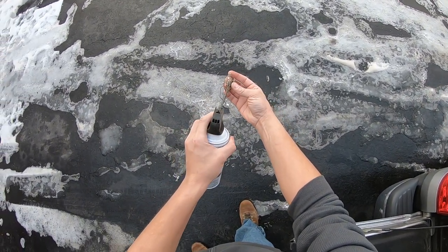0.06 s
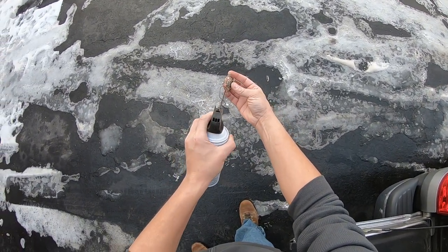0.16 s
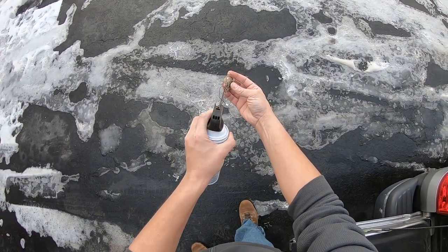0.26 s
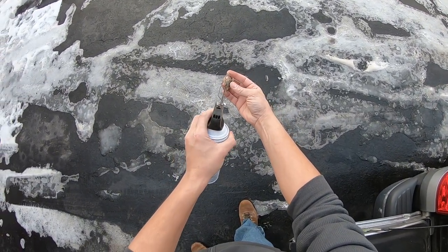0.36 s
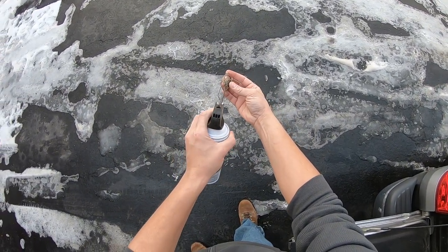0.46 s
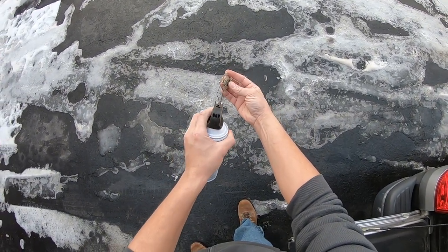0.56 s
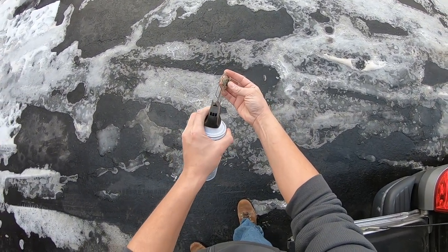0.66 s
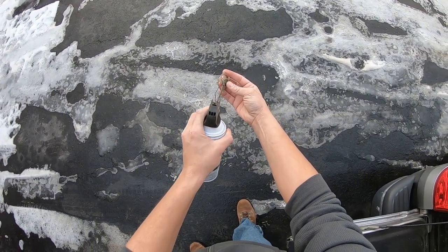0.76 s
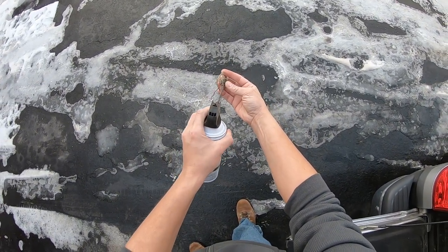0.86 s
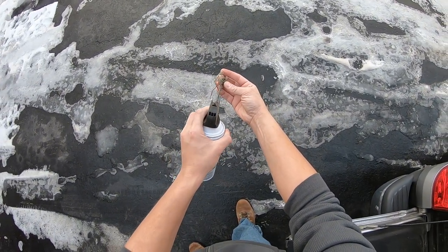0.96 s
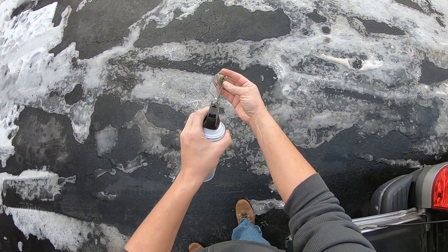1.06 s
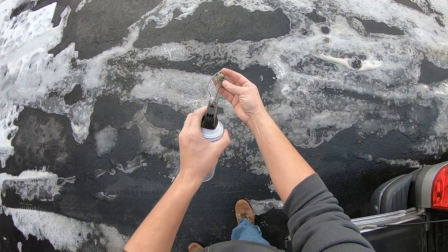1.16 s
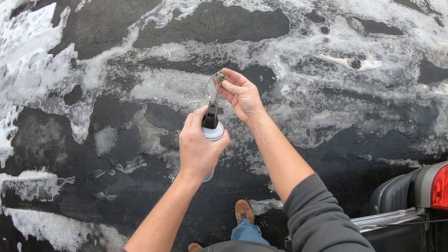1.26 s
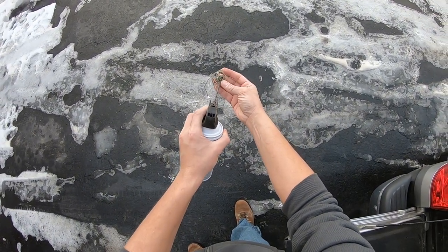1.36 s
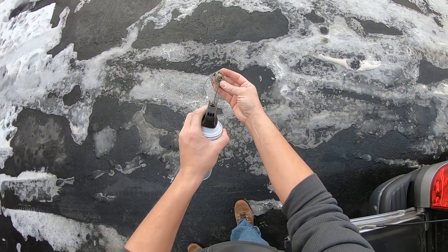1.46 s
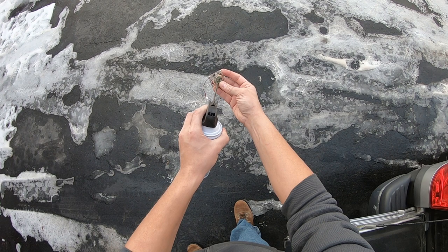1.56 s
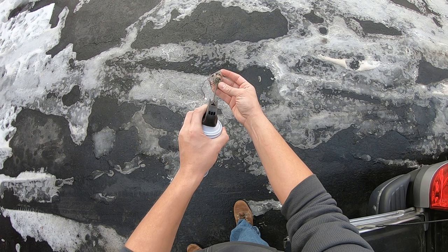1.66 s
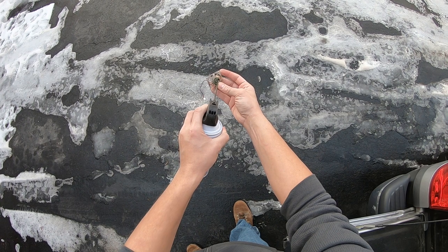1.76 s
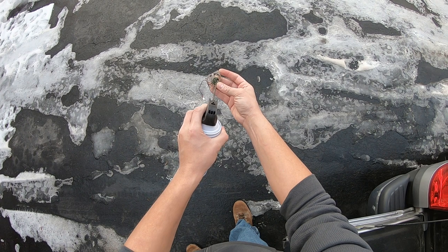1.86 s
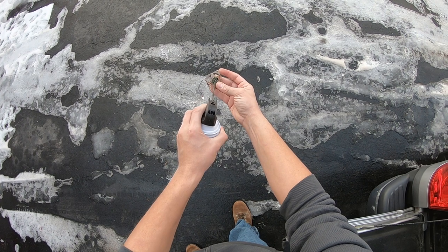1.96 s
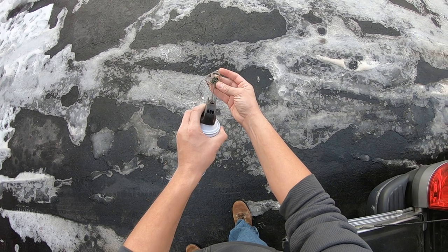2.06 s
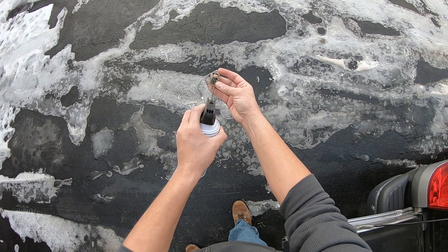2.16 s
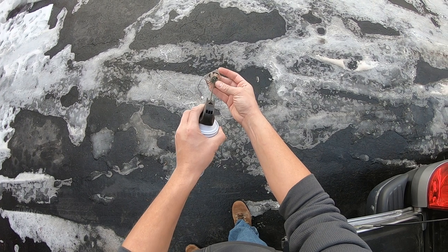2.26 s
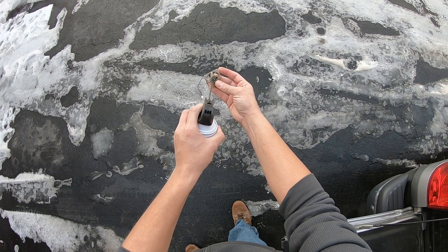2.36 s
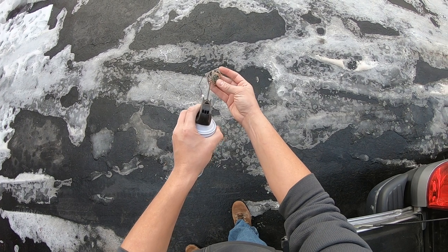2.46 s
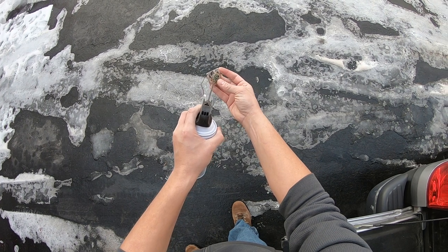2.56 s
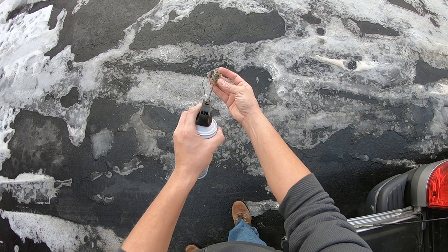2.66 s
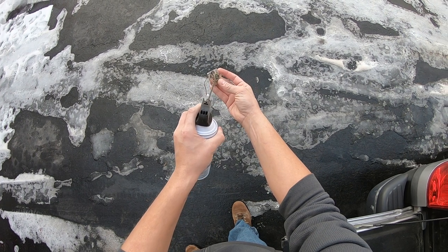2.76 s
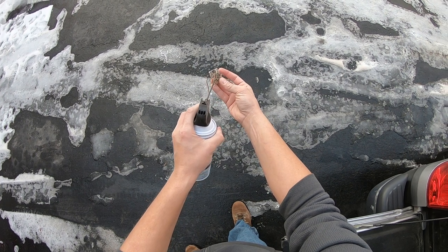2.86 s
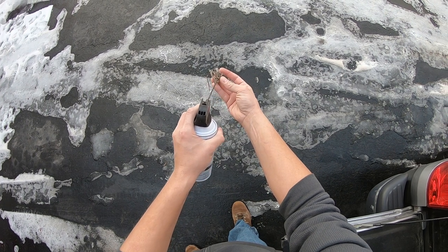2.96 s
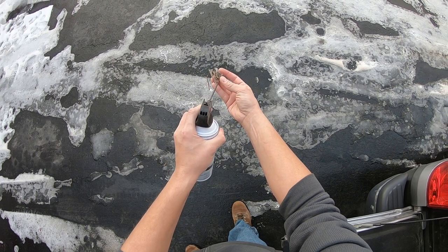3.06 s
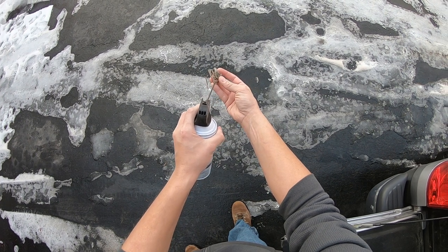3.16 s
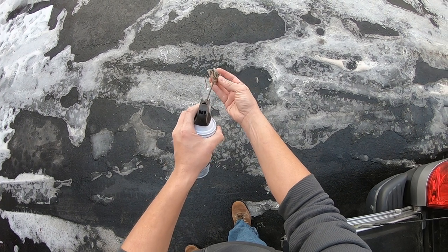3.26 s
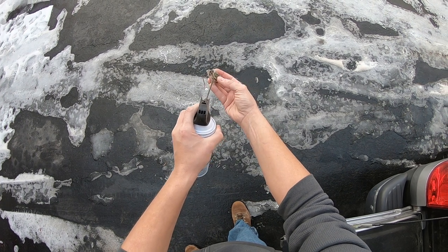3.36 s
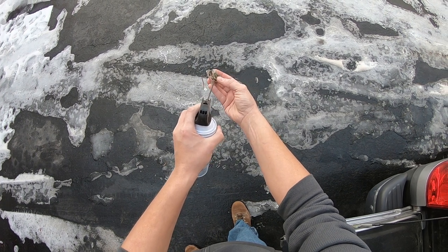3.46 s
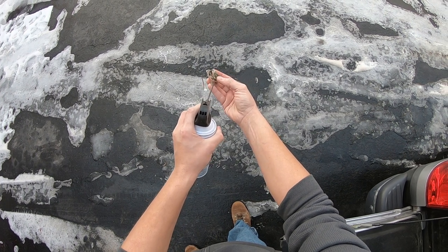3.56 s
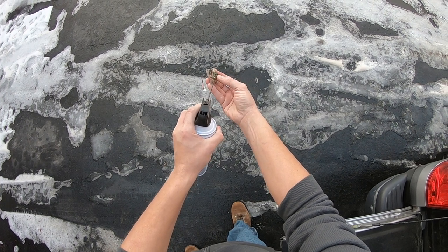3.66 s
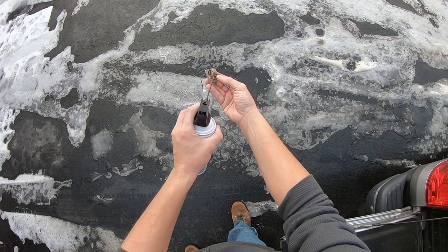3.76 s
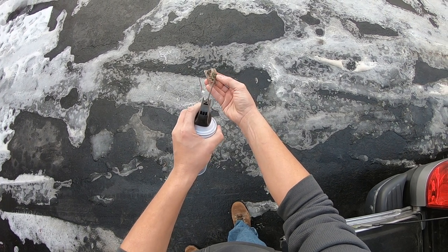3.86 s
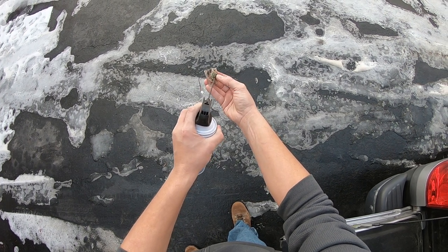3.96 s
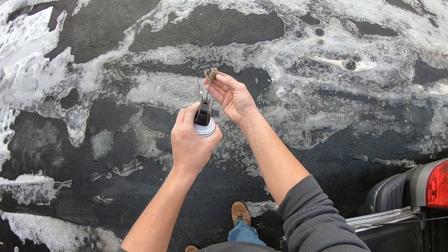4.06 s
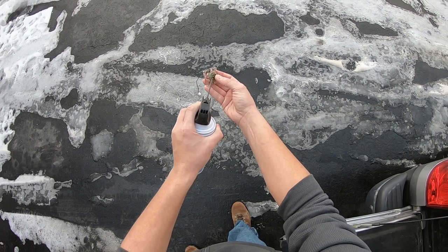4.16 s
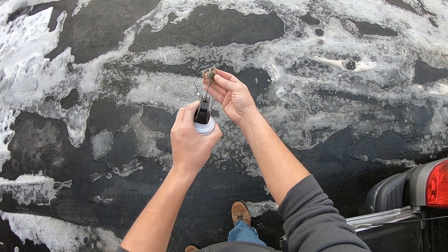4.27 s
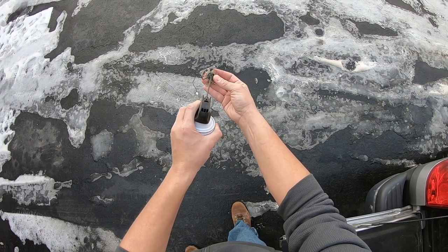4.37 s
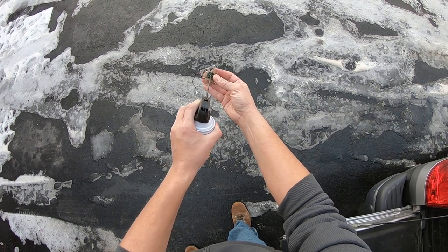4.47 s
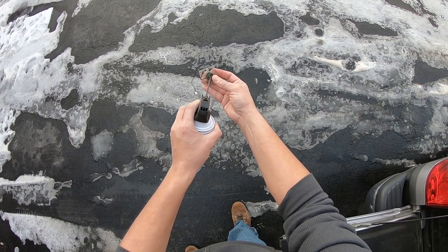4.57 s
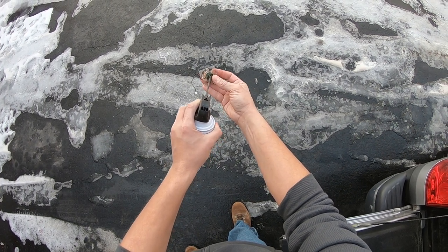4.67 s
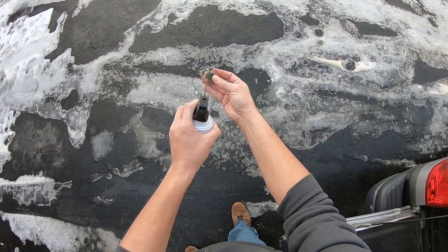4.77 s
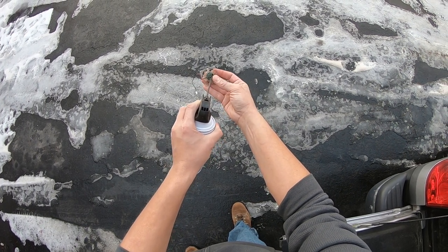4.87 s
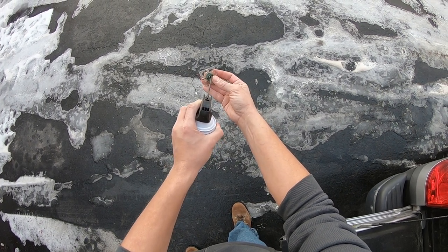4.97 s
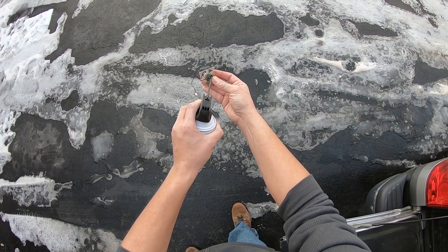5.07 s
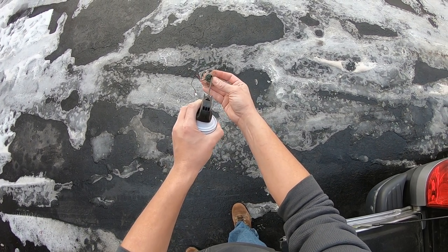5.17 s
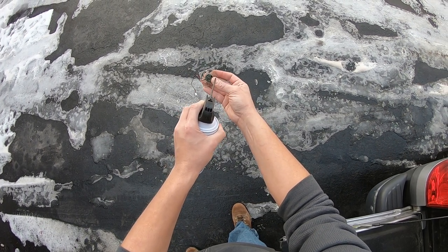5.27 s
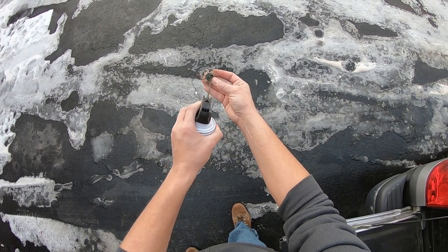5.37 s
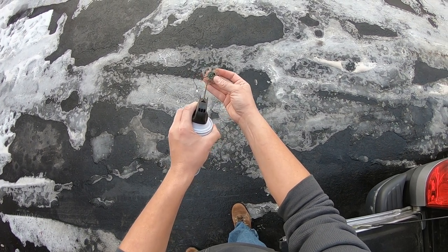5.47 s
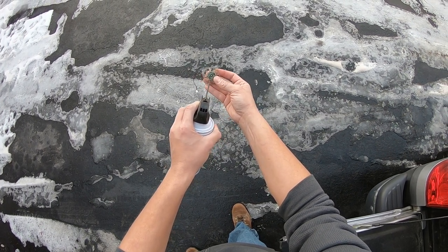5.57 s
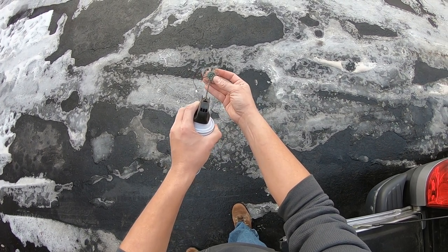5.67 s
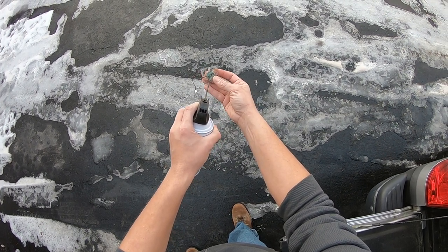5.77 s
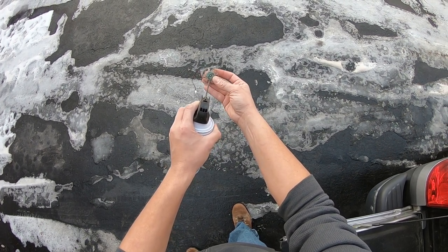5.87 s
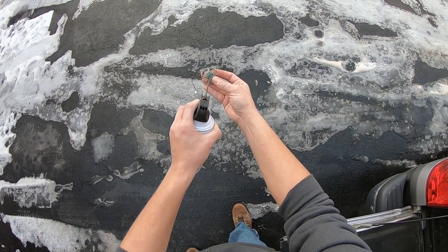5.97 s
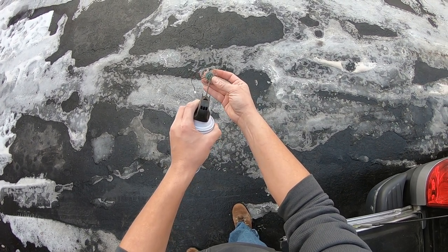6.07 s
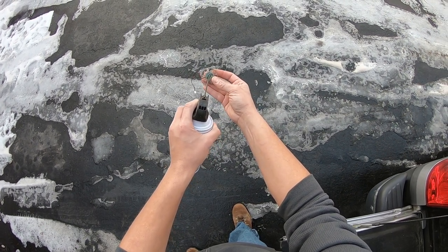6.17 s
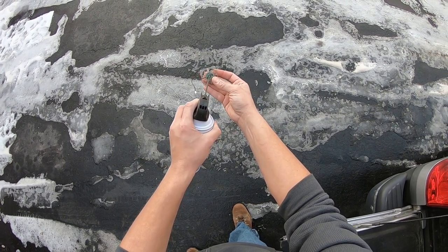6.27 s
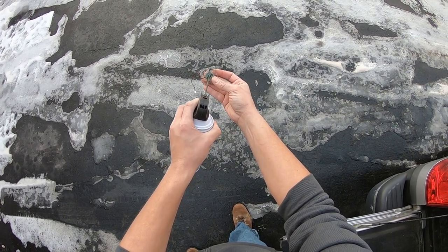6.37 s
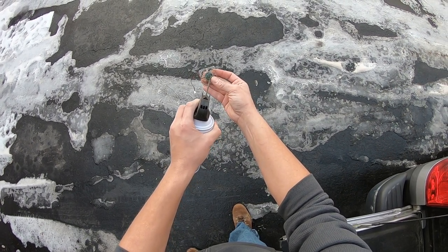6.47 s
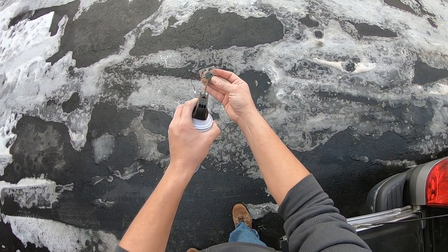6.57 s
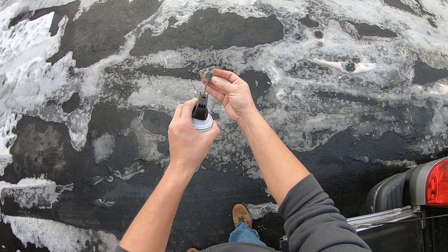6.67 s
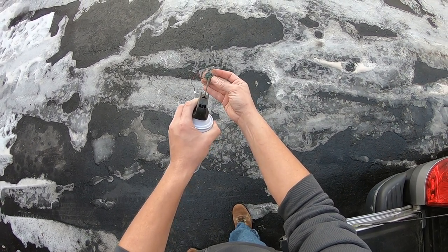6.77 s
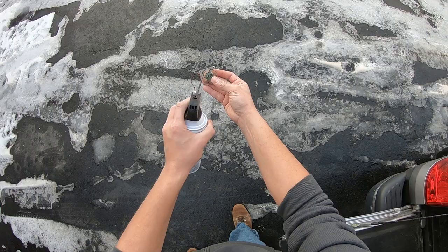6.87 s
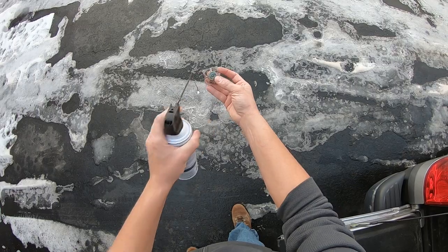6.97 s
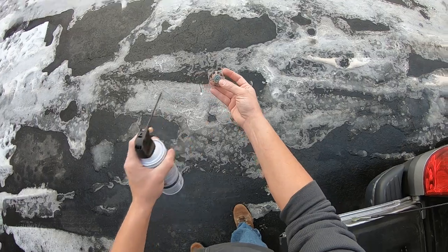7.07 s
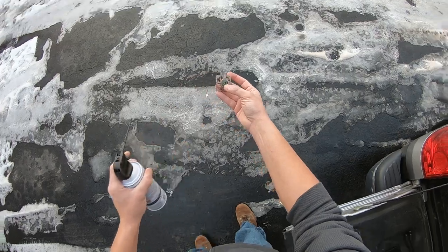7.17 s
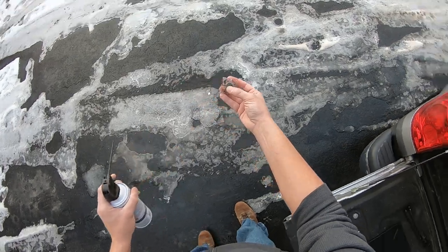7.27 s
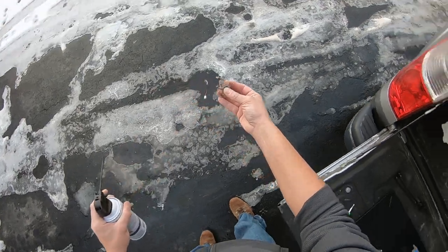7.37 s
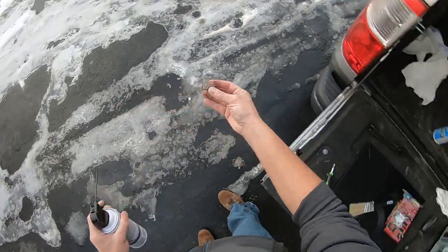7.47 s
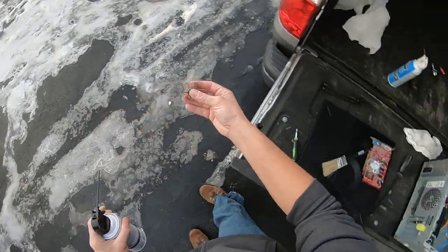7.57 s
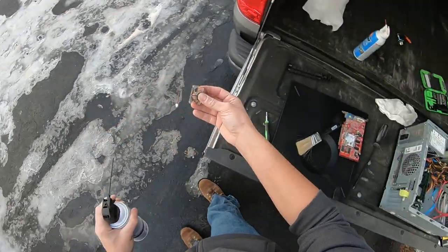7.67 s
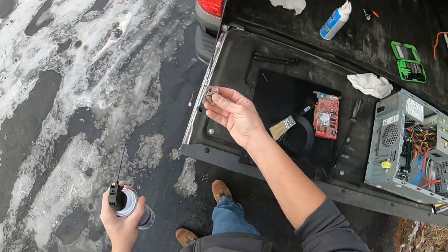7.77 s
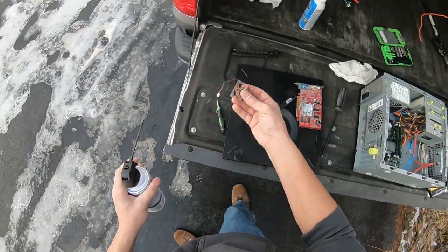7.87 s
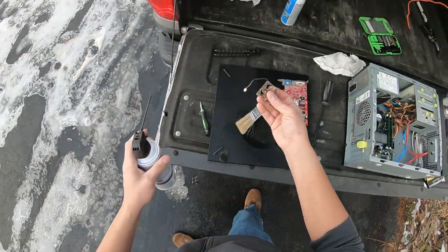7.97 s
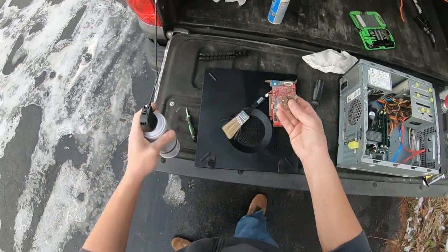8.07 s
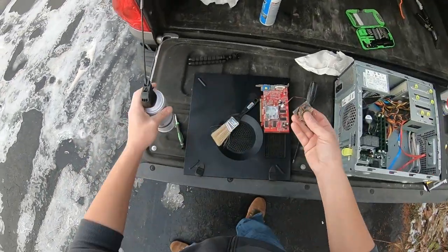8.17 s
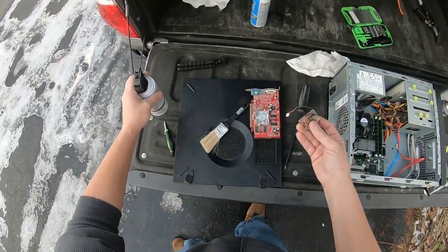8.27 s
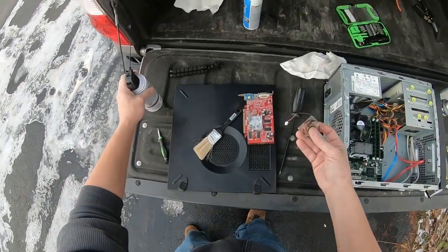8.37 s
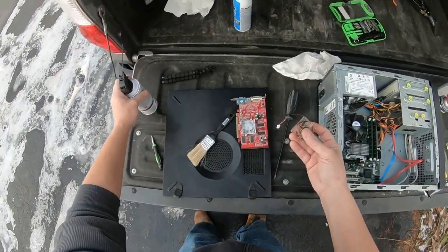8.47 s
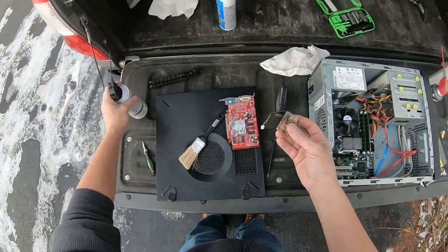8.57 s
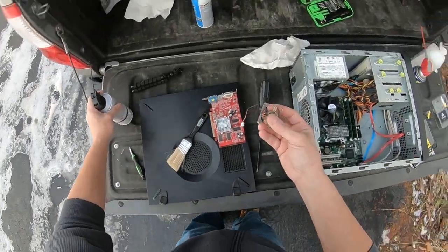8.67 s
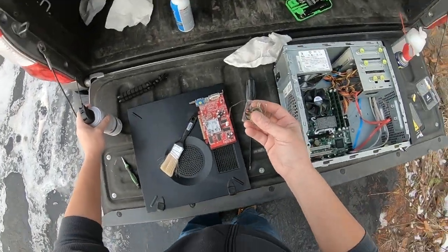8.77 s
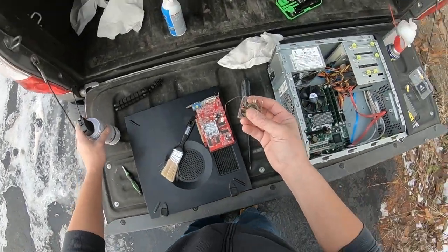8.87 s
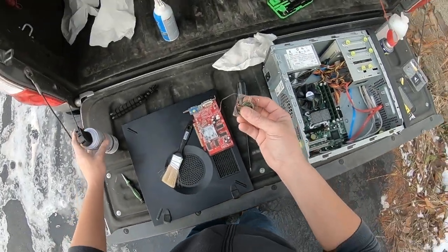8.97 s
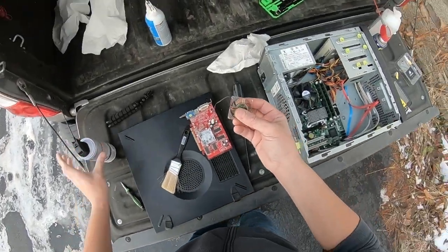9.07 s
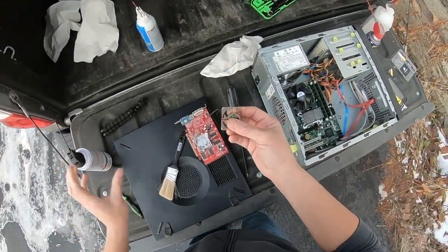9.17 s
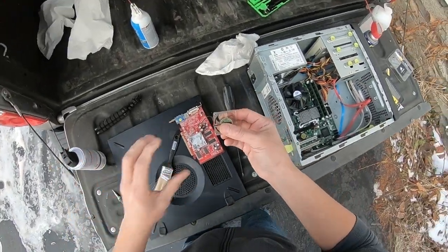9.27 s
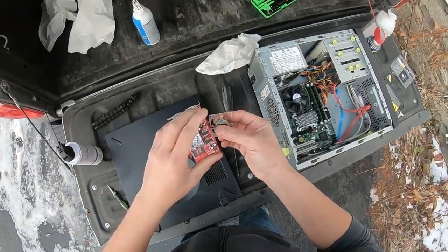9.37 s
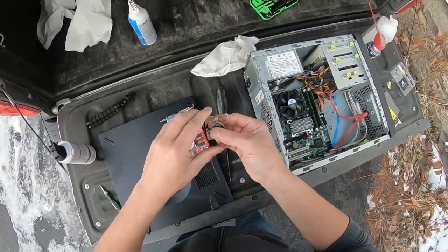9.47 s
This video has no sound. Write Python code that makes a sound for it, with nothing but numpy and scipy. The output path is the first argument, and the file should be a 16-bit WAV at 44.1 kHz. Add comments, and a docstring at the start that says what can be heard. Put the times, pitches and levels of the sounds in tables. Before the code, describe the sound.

Outdoors beside a truck, close to the microphone, an aerosol can blasts a small hand-held fan: two bursts of about a second, then a nearly four-second one. The hiss flickers brighter as it crosses the fan's edges. Sleeves rustle, the can knocks lightly in the hands, then lands on the tailgate with a heavy, hollow thump and short clatter. Quiet open air and a faint low hum lie behind.

```python
"""Outdoors, beside a truck: three bursts from an aerosol duster blow through a small hand-held fan.
The jet is bands of shaped noise; it hisses, and turns bright whenever it cuts across an edge of the fan.
Sleeves scuff as soft noise bands and the can knocks in the hands as short clatters.
Then it lands on the tailgate: ringing sine modes, a noise clatter and a dry crack, with a faint answer
from the yard. Behind it lie broad air noise, a far machine's hum and low buffets at the microphones."""
import sys
import numpy as np
from scipy import signal
from scipy.fft import rfft, irfft, next_fast_len
from scipy.io import wavfile
from scipy.ndimage import map_coordinates

SR = 44100
rng = np.random.default_rng(int(sys.argv[2]) if len(sys.argv) > 2 else 0)


def generate_wav(signal):
    """Clip the signal to [-1, 1] and save it as 16-bit WAV at the path in sys.argv[1]."""
    frames = np.transpose(np.atleast_2d(signal))
    scaled = np.clip(frames, -1, 1) * 32767
    pcm = np.round(scaled).astype(np.int16)
    wavfile.write(sys.argv[1], SR, pcm)


N = 420273
TOP_HZ = 15850  # upper band limit of the microphones


def amp(db):
    """Decibels to gain."""
    return 10 ** (np.asarray(db) / 20)


def unit(x):
    """Scale to rms 1."""
    return x / np.sqrt(np.mean(x ** 2) + 1e-20)


def along(points, hz):
    """Each column of (f/Hz, ..) rows, read on a log frequency axis."""
    f, *cols = np.transpose(points)
    log_hz = np.log(hz + 1)
    return np.squeeze([np.interp(log_hz, np.log(f), c) for c in cols])


def clock():
    """The time of every sample, in seconds."""
    return np.arange(N) / SR


def bell(s, length):
    """A bell-shaped gain that peaks at s and is down 17 dB one length away."""
    return np.exp(-2 * ((clock() - s) / length) ** 2)


def swells(rows):
    """The sum of bells from (t/s, length/s, level/dB) rows."""
    return sum(amp(db) * bell(s, length) for s, length, db in rows)


def gate(start, end, rise, fall):
    """A gain that opens smoothly around start and closes around end."""
    t = clock()
    opening = 1 + np.tanh((t - start) / (2 * rise))
    closing = 1 + np.tanh((end - t) / (2 * fall))
    return opening * closing / 4


def wobble(rate, size=N):
    """A smooth random curve, rate knots a second."""
    knots = rng.standard_normal(int(size * rate / SR) + 4)
    return map_coordinates(knots, [np.arange(size) * rate / SR])


def filtered(x, response):
    """x shaped by a response of frequency."""
    n = x.shape[-1]
    m = next_fast_len(n + 8192)
    spectrum = rfft(x, m) * response(np.fft.rfftfreq(m, 1 / SR))
    return irfft(spectrum, m)[..., :n]


# how sound from the hands reaches the two ports: f/Hz, L-R level/dB, left lead/rad, likeness/0-1
HAND_PORTS = [(150, 0, 3, .4), (453, -0.5, 3.5, 0.5), (750, -1.5, 2.5, 0.6), (1500, -1, 1.3, 0.7),
              (2050, 4.5, 1.4, 0.4), (2480, -0.5, -1, 0.96), (4300, 0, 0.57, 0.99), (4950, -2.5, 0.5, .55),
              (5500, -0.5, 0.53, 0.8), (6650, 2, 1.38, 0.6), (7350, 8, 0.1, .5), (7990, 3, 1.04, .82),
              (9200, 3.5, -0.8, .6), (10010, -3, 0.5, .85), (11000, 4, 1.5, 0.62), (12000, 4, 0.56, .8),
              (15870, 4, 1, .85)]
# how sound from all around reaches them: f/Hz, L-R level/dB, left lead/rad, likeness/0-1
AROUND_PORTS = [(60, -9, 0.29, 0.32), (250, -2, 0.92, 0.25), (700, -3, 1, .55), (1300, 0, 1, .4),
                (2800, -1, 0.0013, 0.44), (5910, -2, 0.68, .3), (15000, 2, 0.2, .1)]


def noise(colour, ports, size=N):
    """Coloured noise at two ports, blended from a shared and an opposed part; their mean has rms 1."""
    m = next_fast_len(size)
    hz = np.fft.rfftfreq(m, 1 / SR)
    tilt, lead, alike = along(ports, hz)
    alike = np.clip(alike, 0, .99)
    left = amp(tilt / 2) * np.exp(.5j * lead)
    shared = np.sqrt(1 + alike) * np.array([left, 1 / left])
    opposed = np.sqrt(1 - alike) * np.array([left, -1 / left])
    a, b = rfft(rng.standard_normal((2, m)))
    centre = np.hypot(abs(shared.mean(0)), abs(opposed.mean(0)))
    spectrum = (a * shared + b * opposed) * amp(along(colour, hz)) / centre
    pair = irfft(spectrum, m)[:, :size]
    return pair / pair.mean(0).std()


def dying(x, decay):
    """Each frequency of x fades with its own t60."""
    hz, t, z = signal.stft(x, SR, nperseg=256)
    fade = amp(-60 * t / along(decay, hz)[:, None])
    return signal.istft(z * fade, SR, nperseg=256)[1][:, :x.shape[-1]]


def add(track, s, sound):
    """Mix a sound into the track at time s."""
    part = track[:, round(s * SR):][:, :sound.shape[-1]]
    part += sound[..., :part.shape[-1]]


def eddies(x, patchy_db, band_hz, life):
    """Patches of the spectrum, band_hz wide and life seconds long, rise and fall at random."""
    hz, t, z = signal.stft(x, SR, nperseg=1024)
    field = rng.standard_normal((int(hz[-1] / band_hz) + 2, int(t[-1] / life) + 2))
    grid = np.meshgrid(hz / band_hz, t / life, indexing="ij")
    patches = map_coordinates(field, grid, order=1)
    return signal.istft(z * amp(patchy_db * patches), SR, nperseg=1024)[1][:, :N]


def chatter(depth_db, rate, size):
    """Surfaces catch and slip: a spiky gain of rms 1."""
    return unit(amp(depth_db * np.clip(wobble(rate, size=size), -2, 2)))


# tint of sound arriving from beside the microphones: f/Hz, level/dB
MUFFLE_TINT = [(1000, 11.5), (3800, 3.5), (4900, -3), (6500, 1.5), (7700, -6), (8800, -11), (16000, -16.5)]


def band(centre_hz, octaves, size):
    """A broad, heavily damped resonance excited by noise."""
    hz = np.geomspace(20, TOP_HZ, 80)
    skirts = 16 * np.log10(1 + (np.log2(hz / centre_hz) / octaves) ** 4)
    colour = np.transpose([hz, along(MUFFLE_TINT, hz) - skirts])
    return noise(colour, AROUND_PORTS, size=size)


def whooshes(rows):
    """Soft swells of noise, each in its own band."""
    out, t = np.zeros((2, N)), np.arange(SR // 2) / SR
    middle = t.mean()
    for s, length, db, centre_hz, octaves in rows:
        swell = amp(db) * np.exp(-2 * ((t - middle) / length) ** 2)
        add(out, s - middle, swell * band(centre_hz, octaves, size=len(t)))
    return out


# colour of the open air: f/Hz, level/dB per Hz (relative)
OPEN_AIR_COLOUR = [(20, -8.5), (45, -8), (100, -14.5), (175, -1.5), (260, -9.5), (550, -17.5), (780, -12),
                   (1050, -20), (2300, -27), (3400, -29), (4700, -33.5), (7000, -33.5), (8500, -39),
                   (12000, -39), (16000, -48)]


def open_air():
    """The broad murmur outdoors, noise whose level drifts gently."""
    return noise(OPEN_AIR_COLOUR, AROUND_PORTS) * amp(-68.5 + .6 * wobble(5.7))


def far_machine():
    """A far machine hums at about 59 Hz, with a weaker third harmonic; pitch and level waver."""
    turn = 2 * np.pi * 59 * clock() + .15 * wobble(3.3)
    fundamental = amp(-68.0 + .6 * wobble(4)) * np.sin(turn)
    third = amp(-80.5 + 2.5 * wobble(5)) * np.sin(3 * turn)
    return fundamental + third


# air buffeting the microphones: t/s, length/s, level/dB
BUFFET_SWELLS = [(7.39, .04, -56), (7.62, 0.12, -64.5), (8.115, 0.037, -46.5), (8.19, 0.1, -52.5)]
# colour of that moving air: f/Hz, level/dB per Hz (relative)
WIND_COLOUR = [(15, 0.5), (30, 6), (50, 2.5), (90, -13), (150, -11), (400, -65)]
# moving air at the two ports: f/Hz, L-R level/dB, left lead/rad, likeness/0-1
DRAUGHT_PORTS = [(30.1, -8, 0, .3), (200, -6, 0, .3)]


def buffets():
    """Moving air pushes on the microphones as brief swells of low noise."""
    return swells(BUFFET_SWELLS) * noise(WIND_COLOUR, DRAUGHT_PORTS)


# fade of the yard's tail: f/Hz, t60/s
YARD_DECAY = [(200, .4), (3000, 0.27), (7000, .45), (15000, 0.22)]


def yard(x):
    """The faint answer of the truck and the yard: a diffuse tail 8.7 ms behind."""
    tail = dying(rng.standard_normal((2, SR // 2)), YARD_DECAY)
    tail = np.pad(tail / np.linalg.norm(tail[0]), ((0, 0), (round(0.0087 * SR), 0)))
    return signal.fftconvolve(x, tail, axes=1)[:, :N]


# sleeves and fingers scuff as the arms move: t/s, length/s, level/dB, centre f/Hz, width/octaves
SLEEVE_SCUFFS = [(7.46, 0.23, -73.5, 4880, 1.1), (7.9, 0.33, -76.5, 2460, 0.53),
                 (8.06, 0.046, -57, 170, 0.44), (8.27, 0.32, -71.5, 5000, 1.26),
                 (8.622, 0.095, -62, 1920, 2.2), (8.628, 0.073, -50, 280, 0.38),
                 (9.18, 0.1, -65, 2250, 0.43), (9.19, 0.098, -70.5, 5440, .7), (9.18, .1, -59.5, 420, 0.97),
                 (9.36, 0.037, -59, 225, 0.66), (9.5, 0.22, -71, 2400, 1)]


def sleeves():
    """Cloth and fingers rub: soft noise bands with a catching, slipping gain."""
    return whooshes(SLEEVE_SCUFFS) * chatter(depth_db=1.0, rate=120, size=N)


# small knocks of can and fan in the hands, levels before the envelopes:
# t/s, body level/dB, body f/Hz, tick level/dB, tick f/Hz, scrape t60/s, thud level/dB
HAND_KNOCKS = [(7.36, -54.5, 1590, -50.5, 6300, 0.084, -58), (7.37, -54, 550, -66, 3500, 0.099, -53),
               (7.389, -65.5, 1500, -63, 5050, 0.22, -54), (8.1025, -52, 1260, -54.5, 3880, 0.24, -56),
               (8.2845, -74.5, 1500, -62, 3400, .04, -78), (8.361, -81, 1500, -63, 4130, .1, -78),
               (8.3915, -52.5, 945, -64, 2700, .03, -54.5), (8.584, -67, 1500, -67, 4500, .09, -52),
               (8.631, -61, 900, -67, 5000, 0.16, -48), (9.391, -52.5, 1300, -63, 3400, 0.12, -57),
               (9.4, -52, 1590, -61, 4440, 0.27, -66)]
# colour of the dull thud: f/Hz, level/dB per Hz (relative)
THUD_COLOUR = [(25, -18), (130, -3.5), (260, 0.5), (400, -10.5), (700, -16), (2000, -47)]


def knocks():
    """Each knock is a short clatter and a bright tick over a dull thud, all damped noise."""
    out, t = np.zeros((2, N)), np.arange(SR // 2) / SR
    for s, body_db, body_hz, tick_db, tick_hz, t60, thud_db in HAND_KNOCKS:
        scrape = amp(-60 * t / t60) * chatter(depth_db=0.5, rate=350, size=len(t))
        body = amp(body_db) * band(body_hz, octaves=0.54, size=len(t))
        tick = amp(tick_db) * band(tick_hz, octaves=0.57, size=len(t))
        contact = amp(-0.5 - 60 * t / 0.02)
        clatter = (body + tick) * (0.73 * scrape + contact) * (1 - np.exp(-t / 0.00044))
        thud_fade = amp(thud_db - 60 * t / 0.19) * (1 - np.exp(-t / 0.0013))
        thud = noise(THUD_COLOUR, AROUND_PORTS, size=len(t)) * thud_fade
        add(out, s, clatter + thud)
    return out


def handling():
    """Sleeve rubs and hand knocks, with a slightly patchy spectrum."""
    return eddies(sleeves() + knocks(), patchy_db=0.5, band_hz=260, life=.15)


# contacts of the can on the tailgate: t/s, ring level/dB before trim, clatter level/dB
LANDING_CONTACTS = [(8.695, -19, -25), (8.7152, -20, -29.5), (8.748, -40, -42.5), (8.968, -57, -67)]
RING_TRIM_DB = -5.5
# the tailgate's modes: f/Hz, relative level/dB, t60/s, L-R level/dB
TAILGATE_MODES = [(88.3, -10, 0.51, 4.5), (105.3, -3.5, .45, 2), (149.5, 2, 0.35, -1),
                  (177.5, 4.5, 0.67, -1), (201, -6.5, 0.41, 3), (214.4, -4, 0.51, -1),
                  (270.3, -1.5, 0.36, 2), (350.6, 3.5, 0.165, 0), (404, -15, 0.38, -2), (488, -25, 0.2, -1),
                  (655, -18.5, 0.31, -2.5), (683, -9, 0.096, -5), (780, -23, 0.31, -5),
                  (833, -3.5, 0.08, -7), (958, -6.5, 0.11, -4), (1326, -15, 0.11, 2.5),
                  (1490, -17.5, .14, 0)]
# colour of the clatter: f/Hz, level/dB per Hz (relative)
CLATTER_COLOUR = [(30, -38), (130, 2.5), (320, 4.5), (520, -11), (850, -15), (1500, -10.5), (2500, -22),
                  (4400, -35), (5200, -34.5), (7500, -41.5), (10000, -62), (16000, -65)]
# fade of the clatter: f/Hz, t60/s
CLATTER_FADE = [(100, 0.72), (350, 0.34), (1000, 0.16), (4000, 0.2), (10000, 0.081)]


def thump():
    """The can's rim lands, then its base, and it rocks to rest; each contact shakes tailgate and liner."""
    out, t = np.zeros((2, N)), np.arange(SR) / SR
    ring = 0  # the can stays on one spot, so every contact rings alike
    for hz, db, t60, pan_db in TAILGATE_MODES:
        pan = amp([[pan_db / 2], [-pan_db / 2]])
        ring = ring + pan * amp(db - 60 * t / t60) * np.sin(2 * np.pi * hz * t)
    ring = ring * (1 - np.exp(-t / 0.0031))
    soft_contact = 1 - np.exp(-(t / 0.00076) ** 2)  # the plastic liner softens the contact
    for s, ring_db, clatter_db in LANDING_CONTACTS:
        add(out, s, amp(ring_db + RING_TRIM_DB) * ring)
        clatter = dying(noise(CLATTER_COLOUR, AROUND_PORTS, size=SR), CLATTER_FADE)
        clatter = clatter * chatter(depth_db=0.5, rate=320, size=SR)
        add(out, s, amp(clatter_db) * clatter * soft_contact)
    return out


def bass_cut(x, corner_hz):
    """The landing is thinned below the corner frequency."""
    return signal.sosfilt(signal.butter(2, corner_hz, "highpass", fs=SR, output="sos"), x)


# colour of the rim's first touch: f/Hz, level/dB per Hz (relative)
CRACK_COLOUR = [(200, -15), (700, 8.5), (1800, 1.5), (2600, -7), (4500, -8), (5000, -35), (9000, -58)]


def rim_crack(db, t60):
    """The steel rim's first touch is a short, dry crack of noise."""
    out, t = np.zeros((2, N)), np.arange(SR // 8) / SR
    fade = amp(db - 60 * t / t60) * (1 - np.exp(-(t / .0004) ** 2))
    add(out, LANDING_CONTACTS[0][0], noise(CRACK_COLOUR, AROUND_PORTS, size=len(t)) * fade)
    return out


def truck_bed(x, wet_db, t60):
    """The ribbed steel walls of the truck bed ring on after a blow."""
    t = np.arange(SR // 2) / SR
    tail = rng.standard_normal((2, len(t))) * amp(-60 * t / t60) * (1 - np.exp(-t / 0.013))
    tail = tail / np.linalg.norm(tail[0])
    tail = filtered(tail, lambda hz: hz / np.hypot(hz, 500))  # the open bed holds little bass
    return x + amp(wet_db) * signal.fftconvolve(x, tail, axes=1)[:, :N]


# the trigger: pressed t/s, released t/s
TRIGGER = [(0.105, 1.209), (1.431, 2.715), (3.06, 6.89)]
# the jet as its aim wanders, one table for each of the first two bursts, levels before trim:
# t/s, core level/dB, nozzle hiss level/dB, spilling gas level/dB
SHORT_JETS = [
    [(0.12, -47, -45.5, -59.5), (0.256, -43, -40, -49), (0.482, -41, -41, -59), (0.826, -39, -43, -54),
     (0.88, -34, -35, -50.5), (0.938, -44.5, -44, -53.5), (1.034, -39.5, -38, -56),
     (1.064, -38.5, -43.5, -44.5), (1.19, -49.5, -55, -50)],
    [(1.47, -38.5, -38, -59), (1.49, -40.5, -38.5, -51.5), (1.632, -49, -50, -63),
     (1.684, -42.5, -41, -60.5), (2.056, -46.5, -47.5, -66), (2.138, -54, -52.5, -67),
     (2.158, -49.5, -47, -66), (2.406, -51.5, -51, -66), (2.69, -44.5, -46.5, -60)],
]
# the last, long burst before trim: t/s, core level/dB, nozzle hiss level/dB, spilling gas level/dB
LAST_JET = [(3.08, -44.5, -46.5, -53), (3.14, -36, -38.5, -53), (3.49, -45, -45, -59),
            (3.64, -41, -43, -52.5), (3.78, -46.5, -48, -61), (3.84, -41.5, -39, -55.5),
            (4.01, -43.5, -41, -60), (4.06, -44, -48, -60.5), (4.53, -48.5, -43.5, -60),
            (4.7, -53, -51, -59.5), (4.9, -47.5, -45, -61.5), (5.1, -50.5, -49, -59.5),
            (5.32, -42.5, -39.5, -54), (5.87, -46, -44, -62.5), (6.07, -47.5, -41, -61),
            (6.17, -47.5, -51, -60), (6.24, -50.5, -44, -63.5), (6.31, -40, -44, -52),
            (6.43, -57.5, -54, -67), (6.46, -48.5, -45.5, -62), (6.72, -49.5, -47.5, -66),
            (6.88, -47.5, -45.5, -58)]
# trim of each layer; the steady sizzle follows the untrimmed nozzle hiss
CORE_DB, NOZZLE_DB, SPILL_DB, SIZZLE_DB = .5, 1.5, -1, -4
OPEN_S, CLOSE_S, SIZZLE_BUILD_S = 0.0061, 0.012, 0.036  # the valve moves; the sizzle builds more slowly
DRAIN_DB, DRAIN_S = -20.5, 0.041  # after release the gas left in the straw sighs away


def flow():
    """Gains of core, nozzle hiss, spill and steady sizzle as the valve opens, shuts and drains."""
    t, out = clock(), np.zeros((4, N))
    for (pressed, released), rows in zip(TRIGGER, [*SHORT_JETS, LAST_JET]):
        s, *levels = np.transpose(rows)
        core, nozzle, spill = [amp(np.interp(t, s, db)) for db in levels]
        sizzle = nozzle * (1 - np.exp(-np.maximum(t - pressed, 0) / SIZZLE_BUILD_S))
        trims = amp([[CORE_DB], [NOZZLE_DB], [SPILL_DB], [SIZZLE_DB]])
        drain = (t > released) * amp(DRAIN_DB) * np.exp(-abs(t - released) / DRAIN_S)
        valve = np.maximum(gate(pressed, released, OPEN_S, CLOSE_S), drain)
        out += valve * trims * np.array([core, nozzle, spill, sizzle])
    return out


# resonance of the gap between straw and fan: t/s, f/Hz
GAP_GLIDE = [(0.12, 3300), (0.36, 3630), (0.59, 3976), (0.82, 2977), (1.25, 3290), (1.33, 3460),
             (2.42, 3330), (2.67, 3560), (3.73, 3450), (3.84, 3204), (4.07, 3695), (4.26, 3370),
             (5.12, 3363), (5.31, 3630), (6.11, 3604), (6.33, 3380), (6.54, 3700), (6.9, 3750)]


def gap_resonance(x, lift_db, width_hz):
    """A broad resonance that slides as the straw moves over the fan."""
    hz, t, z = signal.stft(x, SR, nperseg=512)
    centre = np.interp(t, *np.transpose(GAP_GLIDE))
    bump = 1 / (1 + ((hz[:, None] - centre) / width_hz) ** 2)
    return signal.istft(z * amp(lift_db * (bump - .5)), SR, nperseg=512)[1][:, :N]


def hand_shadow(x, notch_hz, width_hz, depth_db):
    """A reflection off the hand cancels a narrow band, which drifts as the hand trembles."""
    hz, t, z = signal.stft(x, SR, nperseg=512)
    centre = notch_hz + 70 * np.interp(t, clock(), wobble(3.7))
    dip = 1 / (1 + ((hz[:, None] - centre) / width_hz) ** 4)
    return signal.istft(z * amp(-depth_db * dip), SR, nperseg=512)[1][:, :N]


# the jet splutters on the fingers: t/s, length/s, level/dB, centre f/Hz, width/octaves
FINGER_SPLUTTERS = [(0.249, .06, -56.5, 1100, .8), (1.073, 0.027, -51.5, 330, 1),
                    (1.128, 0.02, -42, 1600, 0.26), (1.14, .03, -50, 1100, 0.55),
                    (1.185, 0.027, -53, 1400, .4), (1.16, 0.076, -60.5, 400, .8),
                    (3.088, 0.049, -53, 600, 1.2), (3.149, .035, -59.5, 450, 0.86)]
# the jet sweeps over the hollow of the hand: t/s, length/s, level/dB
HAND_PUFFS = [(6.075, 0.11, -51.5), (6.325, 0.12, -49), (6.595, 0.13, -53)]
# colour of the hollow hand: f/Hz, level/dB per Hz (relative)
HOLLOW_COLOUR = [(150, -35), (220, -16.5), (270, -0.5), (350, -3), (450, -10.5), (620, -15), (900, -17),
                 (1500, -30), (3000, -58.5)]


def jet_on_hand():
    """The jet splutters on the fingers and puffs over the hollow of the hand, with an uneven gain."""
    puffs = swells(HAND_PUFFS) * noise(HOLLOW_COLOUR, AROUND_PORTS)
    return (whooshes(FINGER_SPLUTTERS) + puffs) * chatter(depth_db=1.0, rate=83, size=N)


# the jet cuts across an edge of the fan: t/s, length/s, sizzle level/dB
EDGE_CUTS = [(0.286, 0.18, -42), (0.742, 0.054, -38.5), (0.843, 0.067, -35), (1.001, 0.054, -38),
             (1.455, .2, -38), (1.656, 0.083, -30.5), (1.896, 0.13, -33.5), (2.062, 0.023, -35),
             (2.097, 0.052, -42.5), (2.344, 0.1, -53.5), (2.56, 0.077, -47.5), (3.17, 0.22, -50),
             (3.56, 0.2, -49.5), (3.814, 0.029, -35.5), (3.895, 0.11, -37), (4.137, 0.15, -40.5),
             (4.362, .052, -31), (4.474, 0.062, -32), (4.648, 0.14, -43), (5.26, 0.12, -40),
             (5.976, 0.062, -32), (6.252, 0.091, -29.5), (6.345, .12, -39), (6.529, 0.034, -36.5),
             (6.585, 0.055, -37.5), (6.658, 0.033, -33), (6.71, 0.043, -38), (6.8, 0.02, -36)]
CUT_RISE_S, CUT_FALL_S = .006, .005  # time for the jet to slide on to an edge, and off it
CUT_HISS_DB, CUT_SPILL_DB = -19, -30  # hiss and spill that an edge adds, relative to its sizzle
CUT_ROBS_DB = 1.5  # gas an edge takes from the core
# the jet spits against the blades, and the first row is a spurt as the trigger is pressed: t/s, length/s, extra
# level/dB
BLADE_SPITS = [(0.114, .012, 5.5), (0.443, 0.0095, 4), (0.883, .022, 0.5), (2.171, 0.013, 2.5),
               (2.572, .02, 4), (3.83, 0.021, 0.5), (4.047, .014, 3), (4.385, 0.021, 2.5),
               (6.885, 0.028, 5)]
# colours of the jet's core, nozzle hiss, edge sizzle and spilling gas: f/Hz, level/dB per Hz (relative)
CORE_COLOUR = [(150, -33), (1200, -31), (2000, -13.5), (2500, -3.5), (3100, -3), (3700, -2.5), (4300, -1.5),
               (4900, -10), (5600, -21), (8000, -50)]
NOZZLE_COLOUR = [(3800, -33.5), (4950, -9), (5400, -4.5), (5800, 0.5), (6600, -3), (7600, -4.5),
                 (8300, -10), (9100, -12), (11000, -18), (12300, -33), (16000, -36)]
EDGE_COLOUR = [(4500, -41.5), (6200, -6.5), (7500, 0), (8600, -1.5), (9100, -5), (9700, -0.5),
               (11000, -5.5), (11900, 2.5), (13000, 2), (14200, -0.5), (15100, 0.5), (16000, -6)]
SPILL_COLOUR = [(80, -18), (250, -12.5), (520, -15), (750, -8), (1000, -7.5), (1400, 1.5), (1750, 1),
                (2200, -4), (3500, -28.5)]


def spray():
    """Turbulent gas as noise: core and nozzle hiss, sizzle on the fan's edges, and gas spilling past."""
    core_gain, nozzle_gain, spill_gain, sizzle_gain = flow()
    cut = sum(amp(db) * gate(s, s + length, CUT_RISE_S, CUT_FALL_S) for s, length, db in EDGE_CUTS)
    on_edge = cut / (cut + core_gain + 1e-9)  # 0 clear of the edges, towards 1 on them
    core_gain = core_gain * amp(CUT_ROBS_DB * (.5 - on_edge))
    nozzle_gain = np.hypot(nozzle_gain, cut * amp(CUT_HISS_DB))
    spill_gain = np.hypot(spill_gain, cut * amp(CUT_SPILL_DB))
    edge_gain = np.hypot(sizzle_gain, cut)

    hollow = unit(gap_resonance(noise(CORE_COLOUR, HAND_PORTS), lift_db=7, width_hz=580))
    core = core_gain * hollow * amp(-.5 + 1.4 * wobble(40))
    nozzle = nozzle_gain * noise(NOZZLE_COLOUR, HAND_PORTS) * amp(1.2 * wobble(40))
    edge = edge_gain * noise(EDGE_COLOUR, HAND_PORTS) * amp(1.4 * wobble(70))
    spill = spill_gain * noise(SPILL_COLOUR, HAND_PORTS) * amp(1.3 * wobble(60))

    spits_db = sum(db * bell(s, length) for s, length, db in BLADE_SPITS)
    flutter = amp(0.84 * wobble(45) + 0.52 * wobble(400))  # the flow through the valve is unsteady
    jet = flutter * (amp(spits_db) * (core + nozzle + spill) + edge)
    jet = hand_shadow(jet, notch_hz=4970, width_hz=120, depth_db=6)
    return eddies(jet + jet_on_hand(), patchy_db=2.5, band_hz=190, life=.12)


def scene():
    """All sources, with the yard's answer to the near ones."""
    background = open_air() + far_machine() + buffets()
    landing = bass_cut(thump(), corner_hz=65) + rim_crack(db=-27.5, t60=0.058)
    near = handling() + truck_bed(landing, wet_db=-19, t60=0.61) + spray()
    return background + amp(-24.5) * yard(near) + near


def record(dry):
    """The microphones pass almost nothing above their band limit."""
    return filtered(dry, lambda hz: 1 / (1 + (hz / TOP_HZ) ** 300))


dry = scene()
out = record(dry)
generate_wav(out)
```